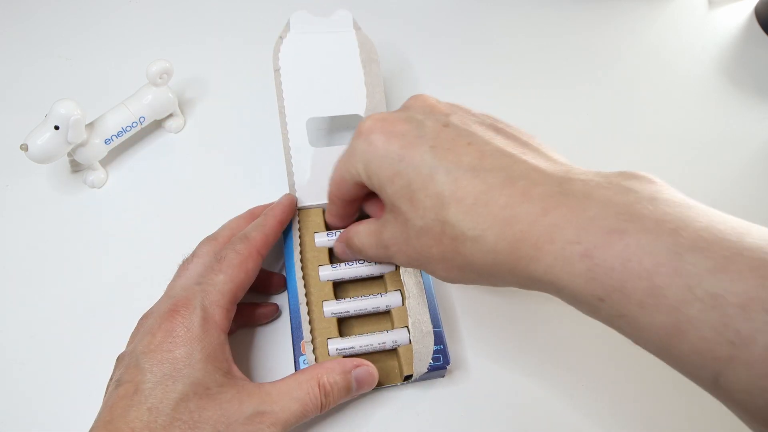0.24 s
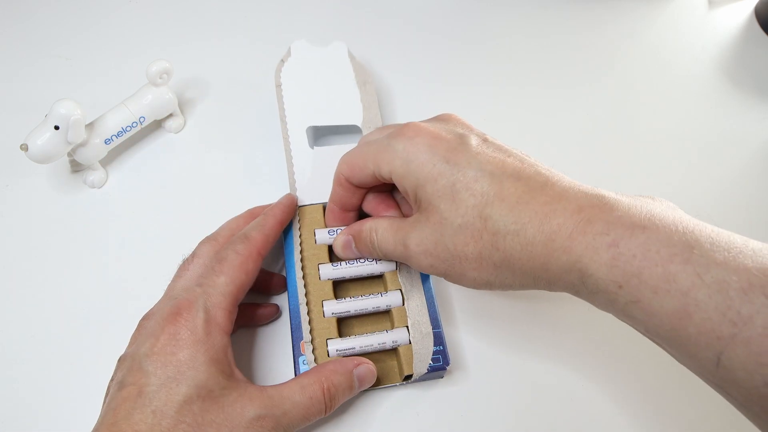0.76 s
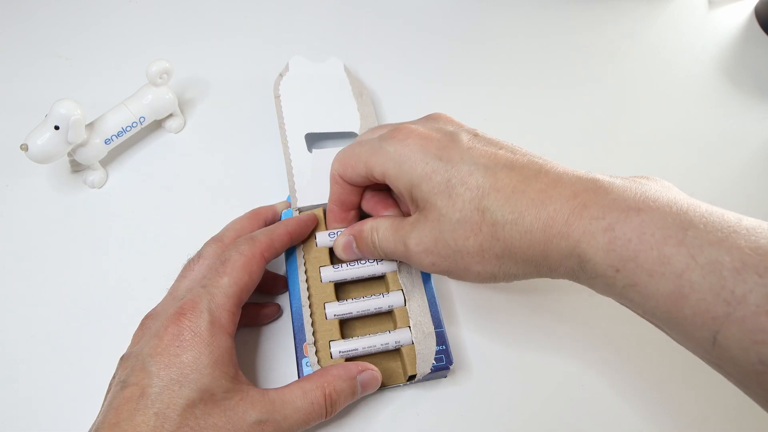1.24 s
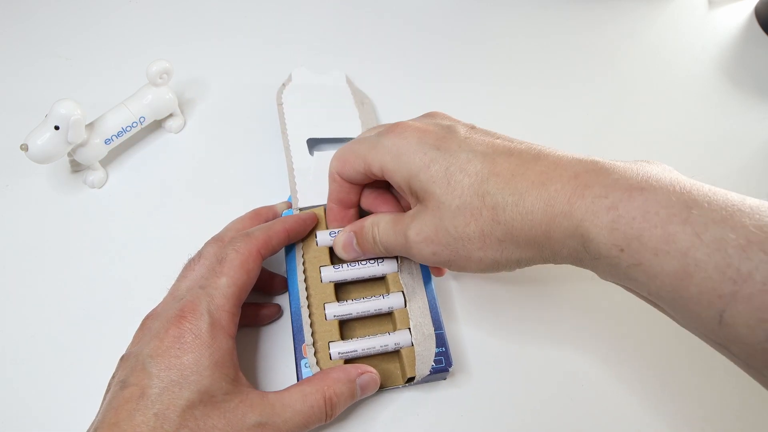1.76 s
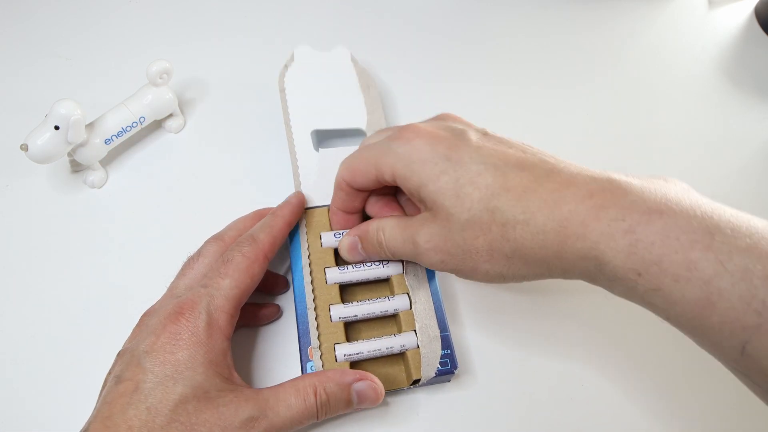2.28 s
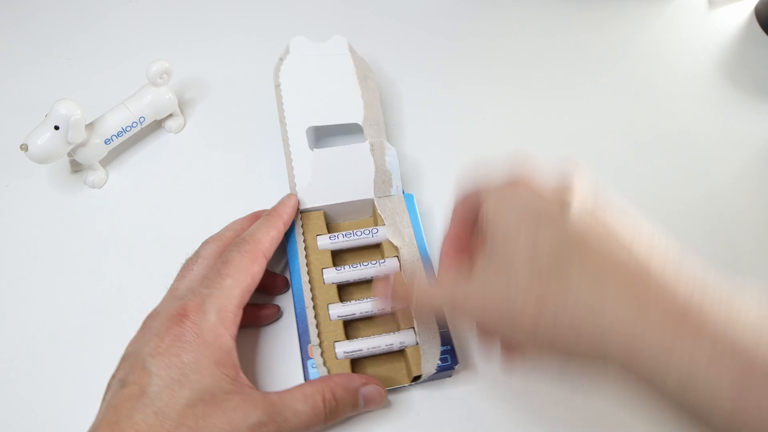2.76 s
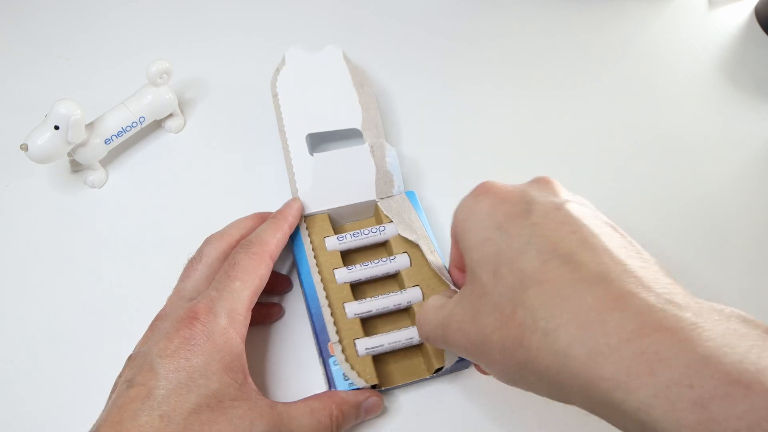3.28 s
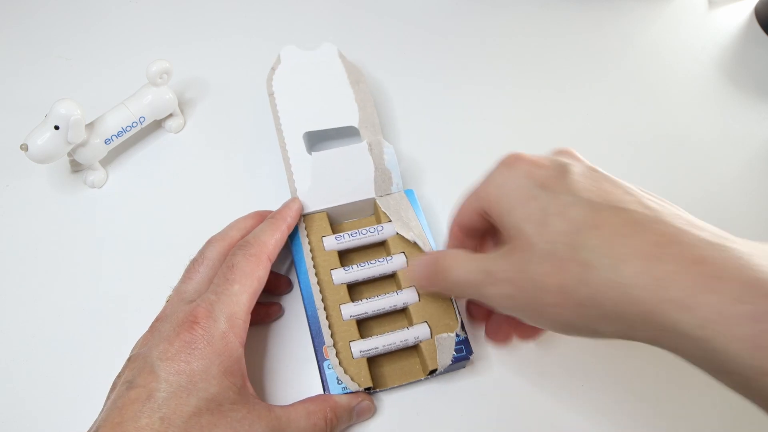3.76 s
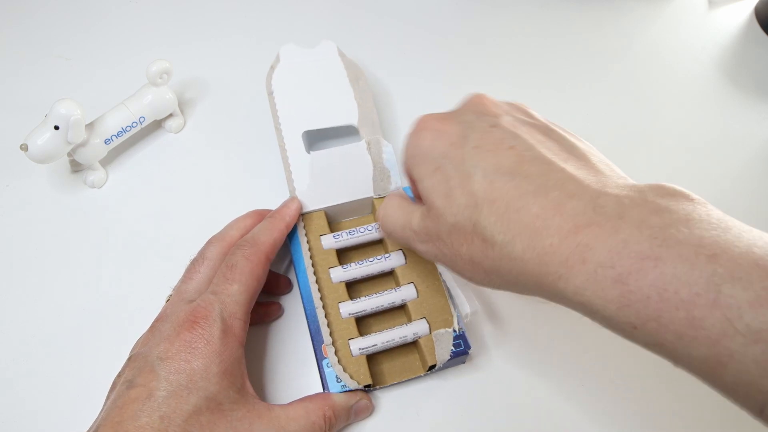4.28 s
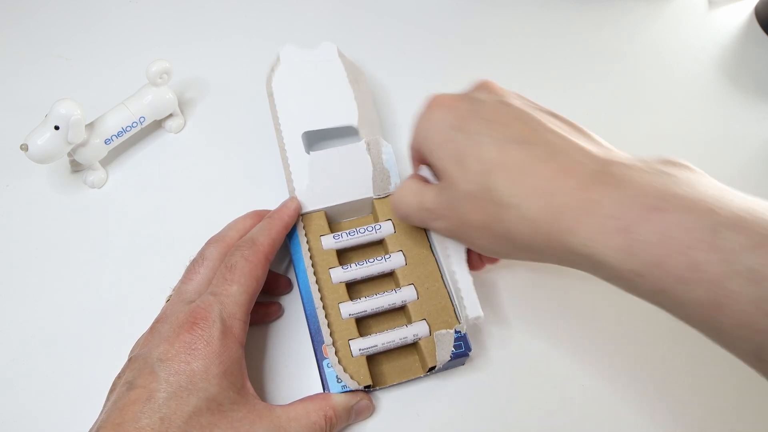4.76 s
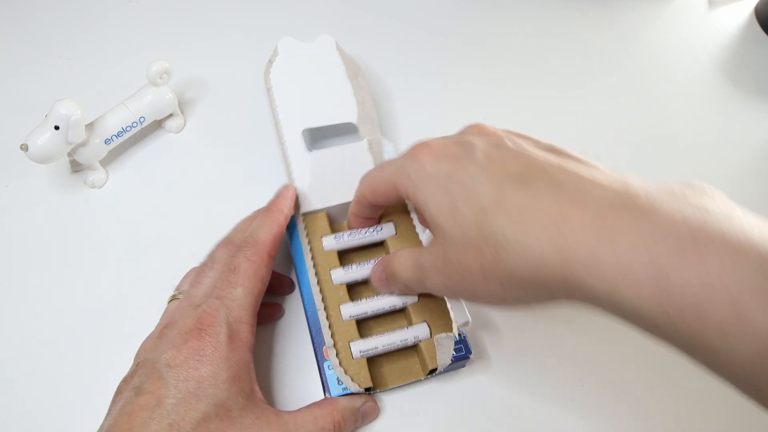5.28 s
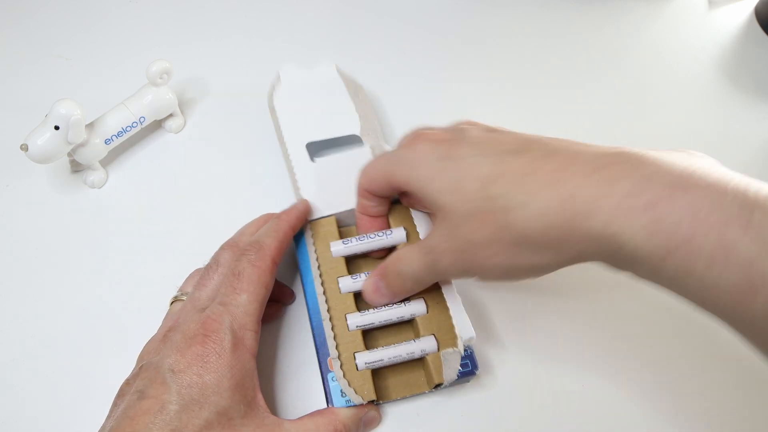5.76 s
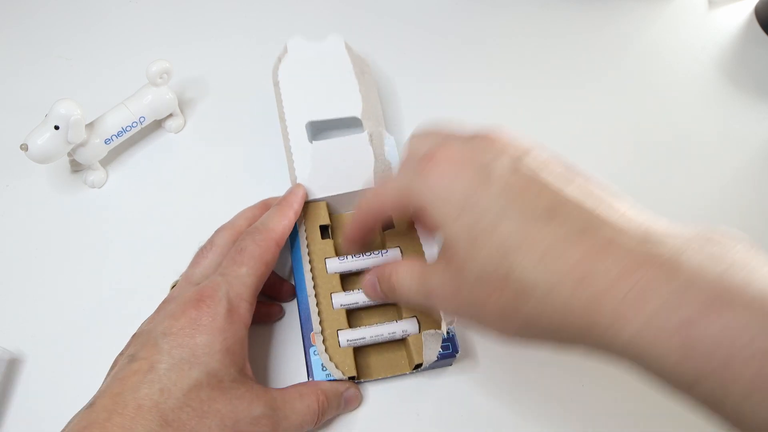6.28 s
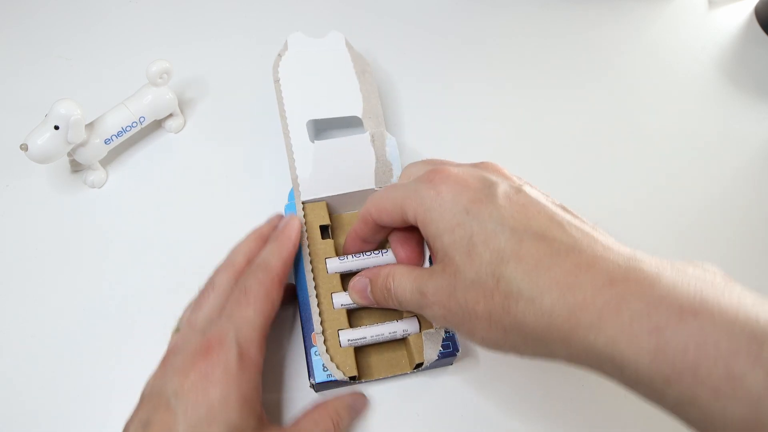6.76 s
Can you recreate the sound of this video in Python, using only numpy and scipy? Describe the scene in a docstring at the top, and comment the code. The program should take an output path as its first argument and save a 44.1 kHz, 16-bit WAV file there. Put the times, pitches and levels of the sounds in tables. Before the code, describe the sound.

Close microphone, indoors at a desk: quiet dry card rubbing and tiny ticks come in short bursts, then crisp ripping and two hard hollow snaps. After a short squeak and the loudest pop, a small battery hits the tabletop, clattering end over end with shrinking bounces, rolling briefly. A little soft card scuffing remains over a steady faint hiss.

```python
"""At a desk in a small room, hands tear the side off a paperboard battery pack and prise a cell out of its tray.
Sliding card is filtered noise with fibre catches; rips, creases and squeaks are bursts that ring card resonances.
Stiff panels pop as resonances with a sinking hollow ring; bumps and the box itself add dull thuds.
The cell drops, bounces end over end and rolls: desk modes, scattered waves and a low hum.
Echoes and diffuse tails surround these over steady noise; gain control and clipping limit the loudest sounds."""
import sys
import numpy as np
from scipy import signal
from scipy.io import wavfile
from scipy.ndimage import uniform_filter1d

SR = 44100
rng = np.random.default_rng(int(sys.argv[2]) if len(sys.argv) > 2 else 0)


def put_to_file(sound):
    """Save the sound as 16-bit audio at rate SR, in the file named by the first command-line argument."""
    columns = np.atleast_2d(sound).T  # one column per channel
    safe = np.clip(columns, -1, 1)
    whole_steps = np.round(safe * 32767)
    wavfile.write(sys.argv[1], SR, whole_steps.astype(np.int16))


N = 309582
TIME = np.arange(N) / SR

# Tabulated levels are relative; each synthesis function applies its own offset.
# Nominal widths, swells and falls are scaled where the resonance or envelope is formed.

# Runs of ripping fibres: t/s, level/dB, card resonance f/Hz, treble level/dB, nominal swell t/s, nominal fall t/s
RIPS = [(0.3624, -28, 5050, -8.5, 0.0022, 0.0041), (0.3644, -34.5, 2300, -20, 0.0032, 0.0066),
        (1.9688, -36, 2170, -11, 0.0015, 0.0099), (2.167, -28.5, 2330, -15, 0.0013, 0.0081),
        (2.648, -34, 5000, -9.5, 0.0054, 0.0086), (3.2977, -20, 6030, -2.5, .0037, 0.0057),
        (3.3628, -27.5, 4450, -0.5, 0.0025, 0.0032), (3.6624, -24, 5240, .5, 0.0025, .004),
        (3.6765, -24.5, 2840, -10, 0.00082, 0.0052), (4.1154, -38, 2320, -1.5, 0.0041, .012),
        (4.3587, -28.5, 2850, -2, 0.00016, 0.023), (4.401, -34.5, 2100, -0.5, 0.0037, 0.002),
        (4.6478, -25.5, 5260, -16.5, 0.0024, 0.019), (4.766, -23, 2050, -4.5, .0016, 0.004),
        (4.7693, -21, 6240, 2, 0.00063, .0013), (5.0722, -45, 2250, 1, 0.0017, 0.003),
        (5.2333, -39, 2730, -7.5, 0.0055, 0.014), (5.85, -21, 2700, -5, 0.00085, 0.0076),
        (5.9387, -28, 2930, -10, 0.0026, 0.001), (6.1085, -36, 3450, -9.5, 0.0012, 0.02)]
# Nominal resonance width and thud level for a patch at PATCH_HZ
RIP_WIDTH_HZ, RIP_BASS_DB = 1200, -11
# Creases that give at once: t/s, level/dB, card resonance f/Hz, treble level/dB, nominal fall t/s
CREASES = [(0.5278, -39.5, 1800, -17.5, 0.01), (0.6927, -39, 1980, -18.5, 0.0052),
           (0.8253, -41.5, 2200, -11, 0.0038), (0.9468, -47.5, 2320, -14, 0.0045),
           (1.193, -46, 2600, -14, 0.0022), (1.202, -34.5, 1800, -8.5, 0.0016),
           (1.3032, -36.5, 1700, -12, .003), (1.3943, -46, 4040, -13, 0.0056),
           (1.441, -31.5, 1830, -8.5, 0.0022), (1.561, -44.5, 3870, -12, .004),
           (1.7843, -47, 4930, -5.5, .002), (1.9016, -38.5, 1780, -26, 0.001),
           (2.2383, -36.5, 1960, -9, 0.0035), (2.4133, -46, 1830, -25, 0.0037),
           (2.462, -46, 2050, -5, 0.0014), (3.012, -45, 1920, -15, 0.0022),
           (3.0266, -42.5, 2190, -13, .002), (3.0406, -46, 2950, -12, 0.0023),
           (3.1486, -45.5, 4200, -13.5, 0.0026), (3.2141, -36.5, 5540, -16, .009),
           (3.2996, -18.5, 1880, -12, .002), (3.5862, -35, 2070, 2.5, 0.0015),
           (3.8252, -36, 3000, -7, 0.0034), (3.9995, -28, 1980, -20, 0.0037),
           (4.0224, -35.5, 1940, -31, .0013), (4.226, -31, 2000, -16, 0.001),
           (4.3255, -32.5, 2160, -19, 0.0046), (4.494, -39, 3050, -34, 0.015),
           (4.606, -30.5, 2900, -15, .005), (4.6775, -33.5, 2000, -5.5, .0025),
           (4.962, -44.5, 1940, -6, 0.00074), (5.185, -54.5, 4970, -2, .0013),
           (5.288, -45.5, 2030, -5.5, 0.0011), (5.3395, -39, 2600, -5.5, .004),
           (5.599, -35, 3400, -7.5, 0.0018), (5.6314, -43, 2070, -6, .009),
           (5.9843, -39.5, 1857, -19, 0.0024), (6.0605, -39, 2030, -11, 0.0035),
           (6.647, -52, 5500, 1, .002), (6.668, -47, 6030, 1, .001)]
# Dull creases ring more narrowly: treble level/dB, nominal width f/Hz
CREASE_WIDTHS = [(-18, 650), (-14.5, 1150)]
CREASE_BASS_DB = -12.5
# A smaller patch of card rings higher and broader and shakes the box less
PATCH_HZ, WIDTH_POWER, BASS_DB_PER_OCTAVE = 2000, 0.25, -4
# Small crackles under the strokes, with level relative to the friction
CRACKLES_PER_S, CRACKLE_OVER_DB, CRACKLE_SPREAD_DB = 26, -4, 5.5
CRACKLE_LOW_HZ, CRACKLE_HIGH_HZ, CRACKLE_TREBLE_DB, CRACKLE_FALL_S = 1700, 3680, -4, 0.0016
CRACKLE_SLIDING_DB = -1.5  # weaker where the card only slides
# Single perforation bridges snap, thin and bright: t/s, level/dB
BRIDGES = [(3.249, -49.5), (3.2697, -43), (3.37, -37), (3.4170, -54), (3.4858, -52.5), (3.6447, -38.5),
           (3.903, -44), (4.4404, -53)]
BRIDGE_HZ, BRIDGE_WIDTH_HZ, BRIDGE_TREBLE_DB, BRIDGE_BASS_DB, BRIDGE_FALL_S = 5500, 1620, 4.5, -16, 0.0023
# The cell squeaks against its slot: t/s, level/dB, pitch f/Hz, nominal width f/Hz, nominal fall t/s
SQUEAKS = [(5.488, -16, 3030, 264, 0.0028), (5.4886, -26, 4410, 347, 0.0014),
           (5.5039, -27.5, 2980, 624, 0.0035), (5.532, -27.5, 1950, 423, 0.0066),
           (5.5446, -34.5, 2000, 400, 0.0028)]
SQUEAK_TREBLE_DB, SQUEAK_BASS_DB, SQUEAK_SWELL_S = -18, -29.5, 0.00073
# Dull bumps of fingers and cell on the tray: t/s, level/dB, card resonance f/Hz, bass level/dB
BUMPS = [(0.873, -41, 1030, -9), (1.055, -46, 1040, -12), (1.084, -48.5, 1040, 2), (1.135, -50, 900, 7),
         (1.374, -52, 840, 17), (1.456, -41.5, 1270, -9), (1.525, -41.5, 1130, -3), (2.2481, -37, 930, 1),
         (5.8058, -27, 1650, 5.5), (5.8637, -23.5, 1480, 2.5)]
BUMP_WIDTH_HZ, BUMP_TREBLE_DB, BUMP_SWELL_S, BUMP_FALL_S = 650, -21, .0009, 0.0035
# Spectrum of the broad rip: f/Hz, level per hertz/dB
RIP_COLOUR = [(300, -37.5), (700, 0), (1200, 1), (2200, 4), (4000, 4), (6000, -3), (8000, -33.5)]
# Spectrum of the box under a rip: f/Hz, level per hertz/dB
THUD_COLOUR = [(60, -34), (130, -4.5), (220, 3), (330, 4.5), (480, -11.5), (1400, -43.5)]

# Fingers and card sliding on card: start t/s, length t/s, friction level/dB, treble level relative to it/dB,
# rumble level of the box/dB, hardest push as a share of the length (0-1)
STROKES = [(0.016, 0.063, -57.5, 2, -61, 0.8), (0.189, 0.3, -53.5, -3.5, -60, 0),
           (0.338, .11, -41.5, -9, -47.5, 0.33), (0.467, 0.087, -48, -5.5, -56.5, 0.26),
           (0.557, 0.22, -58.5, -11, -69, .1), (0.815, 0.073, -50.5, -7, -58, 1),
           (1.01, 0.11, -57, -9, -49, 0.33), (1.193, 0.13, -50.5, -25, -56, .3),
           (1.44, 0.055, -49, -21, -55, 0.4), (1.53, .06, -57.5, -16, -54, 0.3),
           (1.673, 0.13, -57, -22, -49.5, 0.8), (1.907, 0.14, -39, -9.5, -45, 0.5),
           (2.091, 0.033, -41.5, -4.5, -63, 0.23), (2.14, 0.047, -41, -23, -59, 0.8),
           (2.237, 0.071, -48.5, -12, -49.5, 0.05), (2.42, 0.087, -48.5, -12, -50.5, 0.1),
           (2.484, 0.042, -40.5, -16, -47, 0.1), (2.537, 0.12, -39.5, -6, -50.5, 0.33),
           (2.713, 0.042, -61, -3, -56, .4), (2.852, 0.047, -40.5, -3, -51, 0.43),
           (2.943, 0.056, -48, -2, -46.5, 0.03), (3.046, 0.12, -48.5, -12, -52, 0.2),
           (3.205, .08, -51, 1, -73, .95), (3.299, 0.098, -37.5, -8, -44.5, 0.04),
           (3.49, 0.19, -41.5, -4, -49.5, 0.63), (3.655, 0.093, -34, -5.5, -34.5, 0),
           (3.754, 0.1, -41.5, -5.5, -51, 0.04), (3.879, 0.079, -40, -4, -55, 0.34),
           (3.981, 0.062, -41, -8, -46, 0.5), (4.05, 0.069, -49, 0, -68, 0.77),
           (4.151, 0.14, -42.5, -6, -51, 0.6), (4.291, 0.1, -36.5, -4.5, -42, 0.4),
           (4.548, 0.12, -37.5, -10, -58.5, 0.44), (4.688, 0.086, -45.5, -1.5, -65.5, 0.54),
           (4.769, 0.058, -35.5, -18, -36, 0.02), (4.912, 0.04, -42, -5, -46, 0.8),
           (4.991, 0.073, -52.5, -1, -72, 0.94), (5.202, 0.41, -49.5, -6, -62, 0.24),
           (5.383, .085, -36, -7, -37, 0.38), (5.479, 0.08, -34.5, -14, -72, 0),
           (5.612, 0.13, -44.5, -10, -50.5, 0.8), (5.769, 0.09, -42, -9.5, -41.5, 0.9),
           (5.85, 0.12, -39, -4, -36.5, 0.45), (5.996, 0.23, -43.5, -4, -55, 0.04),
           (6.669, 0.16, -52.5, -4, -65, 0.36), (6.82, 0.098, -61, 2, -83, 0.56)]
# A stroke grips, pushes hardest once, is softer at both ends and dies away
GRIP_S, RELEASE_S, EASE_DB = 0.0048, 0.02, 8
HOLD_DB, HOLD_TREBLE_DB, HOLD_RUMBLE_DB = -63, -70, -61.5  # faint friction of the holding hand
# Faint holding friction sinks between the two times; a row whose second time is earlier has no effect:
# first t/s, second t/s
HOLD_DIPS = [(0.09, 0.2), (1.81, 1.8), (2.77, 2.65), (5.09, 5.21), (6.7, 6.3)]
HOLD_DIP_DB = -7
# Stretches where the card really tears rather than slides: start t/s, end t/s
TEARS = [(0.35, 0.45), (1.93, 2.37), (3.52, 4.14), (4.3, 4.42), (4.571, 4.62)]
# Spectrum of the sliding body: f/Hz, level per hertz/dB
RUB_COLOUR = [(150, -17.5), (400, -7), (700, -6), (1100, 2), (1500, 0), (2100, 3.5), (3000, -2.5),
              (4000, -3), (5500, -2), (7000, -9.5), (9500, -34)]
# Spectrum of the treble in sliding and rips: f/Hz, level per hertz/dB
FIZZ_COLOUR = [(3500, -33), (5500, 0.5), (7000, 6), (8500, 7), (11000, 0), (13000, -7), (16000, -18.5)]
# Spectrum of the sliding rumble: f/Hz, level per hertz/dB
RUMBLE_COLOUR = [(30, -13.5), (70, 0), (120, 2.5), (180, -1.5), (320, 4.5), (480, -7), (700, -5.5),
                 (1400, -35)]

# Panels snapping free: t/s, panel peak level/dB, panel f/Hz, hollow ring level/dB, box thump level/dB, thump f/Hz
POPS = [(3.2994, -1, 1080, -19.5, -25.5, 349), (4.7691, -7, 1412, -23.5, -23, 229),
        (5.853, 3.5, 1755, -31, -28.5, 301.5), (5.8645, -33, 763, -37, -24.5, 234)]

# The cell strikes the desk, one end and then the other: t/s, strength level/dB
BOUNCES = [(6.1897, 1.5), (6.1971, 3), (6.3380, 1), (6.3423, 2), (6.4278, -10), (6.4350, -2),
           (6.487, -10.5), (6.4945, -8), (6.5185, -11), (6.524, -10), (6.5427, -13.5), (6.5450, -12.5),
           (6.5622, -13), (6.5744, -17.5), (6.5839, -22), (6.59, -22), (6.7233, -38.5)]
# Modes of the desk: f/Hz, level/dB, 60 dB decay before the cell's added damping t/s
DESK = [(327, -6, .06), (553, -14, .06), (689, -13, .06), (843, -12, .06), (1046, -13, .06),
        (1351, -4, .06), (1494, -3, .06), (1764, -1, .06), (1961, -2, .06), (2319, 0, .07), (2523, -4, .07),
        (2653, -3, .07), (2859, -2, .07), (3108, -3, .07), (3226, -3, .07), (3327, -6, .06),
        (3578, -4, .06), (3807, -6, .06), (4049, -7, .06), (4226, -6, .06), (4834, -12, .05)]
# Spectrum of the hard knock: f/Hz, level per hertz/dB
KNOCK_COLOUR = [(40, -40), (130, -29.5), (250, -0.5), (500, -6), (650, -3), (900, -11), (1500, 2),
                (2400, 2.5), (3600, -1.5), (5000, -5.5), (6500, -22), (10000, -29), (16000, -54)]
# Loudness of the rolling cell: t/s, level/dB
ROLL = [(6.55, -64), (6.6, -33), (6.68, -61), (6.73, -38.5), (6.8, -59), (6.85, -46), (6.92, -58),
        (7.02, -49.5)]
# Low desk modes excited by rolling: f/Hz, nominal width f/Hz, level/dB
ROLL_MODES = [(303, 24, 2), (594, 190, -7)]

# Reflections from desk, walls and ceiling: delay t/s, level/dB
ECHOES = [(.0088, -7), (0.0141, -19.5), (0.014, -19.5), (0.0197, -26), (.0315, -33.5), (0.042, -35.5)]
# Reverberation time of the room: f/Hz, 60 dB decay t/s
ROOM_T60 = [(200, 0.12), (550, 0.47), (1400, 0.3), (3500, 0.37), (6000, 0.35), (10000, 0.27), (16000, 0.46)]
# Spectrum of the steady room noise: f/Hz, level per hertz/dB
FLOOR = [(20, 11.5), (50, 8.5), (90, 4.5), (150, 6.5), (300, -4), (550, -4.5), (1000, -6), (2000, -17.5),
         (4000, -18.5), (8000, -21), (16000, -22)]
LOW_CUT_HZ, EDGE_HZ = 115, 15900


def ripping(level, size=4096):
    """Avalanche fracture: breaking fibres swell, let go and excite damped resonances of the card."""
    out = np.zeros(N)
    t = (np.arange(size) - size // 4) / SR
    broad, fizz, thud = click(RIP_COLOUR), click(FIZZ_COLOUR), click(THUD_COLOUR)
    for s, db, hz, width, bass_db, treble_db, swell, fall in breaks(level):
        rise = -(t / max(2.4 * swell, 1 / SR)) ** 2
        decay = -t / max(0.85 * fall, 1 / SR)
        shape = np.exp(np.where(t < 0, rise, decay))
        burst = unit(fibres(per_s=3300, spread_db=-2.5, hiss=1.0, size=size) * shape)
        burst[size // 4] += 0.61 * np.exp(-swell / 0.00054)  # a crease that gives at once starts with a snap

        card = through(burst, broad)
        ring = resonate(resonate(card, hz, 1.1 * width), hz, 1.1 * width)
        # against a sharp resonance the slips lock into a tone
        squeak = np.clip((480 - width) / 200, 0, 1)
        tone = unit(shape * np.sin(2 * np.pi * hz * t))
        ring = np.sqrt(1 - squeak) * unit(ring) + np.sqrt(squeak) * tone
        # a loose, well damped flap sounds broader
        spill = np.clip((width - 220) / 650, .08, 1.2)

        sound = unit(unit(ring) + spill * unit(card))
        sound += amp(treble_db - 1.0) * unit(through(burst, fizz))
        sound += amp(bass_db - 9.0) * unit(through(burst, thud))
        add(out, s + t[0], amp(db + 0.55) * np.sqrt(SR / 10 ** 2) * sound)
    return out


def breaks(level):
    """Impulsive excitation: yields t/s, level/dB, f/Hz, width/Hz, bass/dB, treble/dB, swell/s, fall/s."""
    for s, db, hz, treble_db, swell, fall in RIPS:
        yield s, db, hz, *patch(hz, RIP_WIDTH_HZ, RIP_BASS_DB), treble_db, swell, fall
    for s, db, hz, width, fall in SQUEAKS:
        yield s, db, hz, width, SQUEAK_BASS_DB, SQUEAK_TREBLE_DB, SQUEAK_SWELL_S, fall
    for s, db in BRIDGES:
        yield s, db, BRIDGE_HZ, BRIDGE_WIDTH_HZ, BRIDGE_BASS_DB, BRIDGE_TREBLE_DB, 0, BRIDGE_FALL_S
    for s, db, hz, bass_db in BUMPS:
        yield s, db, hz, BUMP_WIDTH_HZ, bass_db, BUMP_TREBLE_DB, BUMP_SWELL_S, BUMP_FALL_S
    for s, db, hz, treble_db, fall in CREASES + crackles(level):
        width = np.interp(treble_db, *np.transpose(CREASE_WIDTHS))
        yield s, db, hz, *patch(hz, width, CREASE_BASS_DB), treble_db, 0, fall


def patch(hz, width_hz, bass_db):
    """Scaling of resonators: a smaller patch rings higher and broader, with less bass from the box."""
    width = width_hz * (hz / PATCH_HZ) ** WIDTH_POWER
    bass = bass_db + BASS_DB_PER_OCTAVE * np.log2(hz / PATCH_HZ)
    return width, bass


def crackles(level, count=400):
    """Poisson process: small creases give at random, as loud as the hand is pushing, most of all in a tear."""
    wait, size, place = rng.random((count, 3)).T
    times = np.cumsum(-np.log(1 - wait)) / CRACKLES_PER_S
    strain_db = 20 * np.log10(level) + CRACKLE_SLIDING_DB * (1 - during(TEARS))
    db = np.interp(times, TIME, strain_db) + CRACKLE_OVER_DB + CRACKLE_SPREAD_DB * (2 * size - 1)
    hz = CRACKLE_LOW_HZ * (CRACKLE_HIGH_HZ / CRACKLE_LOW_HZ) ** place
    return [(s, d, f, CRACKLE_TREBLE_DB, CRACKLE_FALL_S) for s, d, f in zip(times, db, hz) if s < TIME[-1]]


def rubbing(level, treble, shake):
    """Stick-slip friction: sliding hisses, tearing adds catches, and a shifting grip favours other patches."""
    share = .12 + .65 * during(TEARS)  # share of the power in catching fibres
    catches = fibres(per_s=520, spread_db=3.7, hiss=0, size=N) * amp(2.5 * drift(per_s=90) - .7)
    slide = rng.standard_normal(N) * amp(.9 * drift(per_s=150))
    grain = np.sqrt(1 - share) * slide + np.sqrt(share) * catches

    # smoothed random gains over frequency and time
    hz, t, z = signal.stft(grain, SR, nperseg=256)
    patches = uniform_filter1d(rng.standard_normal(z.shape), size=10, axis=0)
    patches = evened(uniform_filter1d(patches, size=8, axis=1))
    grain = signal.istft(z * amp(2.93 * patches), SR, nperseg=256)[1][:N]

    body = level * amp(2.0) * evened(through(grain, click(RUB_COLOUR)))
    fizz = treble * amp(0.7) * evened(through(grain, click(FIZZ_COLOUR)))
    shaking = fibres(per_s=150, spread_db=-1.5, hiss=0.54, size=N)
    rumble = shake * amp(-1.86) * evened(through(shaking, click(RUMBLE_COLOUR)))
    return body + fizz + rumble


def friction():
    """Power addition: stroke powers add to the holding hand, giving friction, treble and rumble gains."""
    holding = amp(HOLD_DIP_DB * during(HOLD_DIPS))
    power = (amp([[HOLD_DB], [HOLD_TREBLE_DB], [HOLD_RUMBLE_DB]]) * holding) ** 2
    t = np.arange(SR // 2) / SR - GRIP_S / 2
    for start, length, db, treble_db, rumble_db, push in STROKES:
        hardest = np.clip(push, .02, .98) * length
        effort = amp(np.interp(t, [0, hardest, length], [-EASE_DB, 0, -EASE_DB]))
        grip = np.clip(t / GRIP_S + .5, 0, 1)
        release = np.exp(-np.maximum(t - length, 0) / RELEASE_S)
        shape = effort * grip * release
        for layer, layer_db in zip(power, (db, db + treble_db, rumble_db)):
            add(layer, start + t[0], (amp(layer_db) * shape) ** 2)
    return np.sqrt(power)


def popping(size=8000):
    """Snap-through: a bent panel flips straight, the hollow of the box rings on, and the box thumps the desk."""
    out, t = np.zeros(N), np.arange(size) / SR
    kick = signal.unit_impulse(size)
    for s, db, hz, ring_db, thump_db, thump_hz in POPS:
        panel = resonate(resonate(kick, hz, 0.28 * hz), hz, 7.1 * hz)
        thump = resonate(resonate(kick, thump_hz, 77), thump_hz, 200)
        sag = 0.83 + .25 * np.exp(-t / 0.015)  # the ring sinks as the panel relaxes
        slow = signal.butter(2, 190, fs=SR, output="sos")
        flutter = evened(signal.sosfilt(slow, rng.standard_normal(size)))
        hollow = flutter * np.sin(2 * np.pi * np.cumsum(hz * sag) / SR) * amp(ring_db + 1.5 - 60 * t / 0.15)
        panel = amp(db) * panel / abs(panel).max()
        thump = amp(thump_db) * thump / abs(thump).max()
        add(out, s, panel + thump + hollow)
    return out


def clatter(size=8192):
    """Modal excitation: hard steel knocks the desk, rings its modes and scatters waves from its edges."""
    out, t = np.zeros(N), np.arange(size) / SR
    hz, mode_db, t60 = np.transpose(DESK)[:, :, None]
    knock = click(KNOCK_COLOUR)
    for s, db in BOUNCES:
        # every landing place favours other modes
        spot = (1 + .3 * rng.standard_normal(hz.shape)) * rng.choice([-1, 1], hz.shape)
        # the cell's own weight adds 150 dB/s of damping
        fading = amp(mode_db - 60 * t / t60 - 150 * t)
        modes = unit((spot * fading * np.sin(2 * np.pi * hz * t)).sum(0))
        scatter = unit(rng.standard_normal(size) * amp(-60 * t / 0.018))
        scatter[0] += .6
        add(scatter, .0021, np.array([.4]))  # the wave returns from the nearest edge
        add(out, s, amp(db + 24.5) * (0.61 * modes + 1.01 * unit(through(scatter, knock))))
    return out


def rolling():
    """Forced vibration: random rolling contact hums in the lowest modes of the desk."""
    contact = rng.standard_normal(N)
    hum = np.zeros(N)
    for hz, width, db in ROLL_MODES:
        hum += amp(db) * resonate(resonate(contact, hz, 1.3 * width), hz, 1.0 * width)
    level_db = np.interp(TIME, *np.transpose(ROLL), left=-120) - 2
    return evened(hum) * amp(level_db)


def room(x, echo_db, tail_db, size=24000, count=4):
    """Reverberation: a few near echoes precede short diffuse tails, which alternate every 47 ms."""
    early = np.zeros(size)
    softened = signal.lfilter([.6], [1, -.4], signal.unit_impulse(32))
    for delay, db in ECHOES:
        add(early, delay, amp(db + echo_db) * softened)
    out = x + through(x, early)
    place = np.floor(TIME / .047) % count
    # small sources send little bass into the room
    bass_cut = signal.butter(1, 380, "high", fs=SR, output="sos")
    for k in range(count):
        hz, t, z = signal.stft(rng.standard_normal(size), SR, nperseg=256)
        fading = amp(-60 * t / read(ROOM_T60, hz)[:, None])
        tail = signal.istft(z * fading, SR, nperseg=256)[1]
        tail = signal.sosfilt(bass_cut, tail)
        onset = np.minimum(np.arange(len(tail)) / SR / .006, 1)
        tail = amp(tail_db) * unit(tail * onset)
        turn = np.sqrt(abs(uniform_filter1d(1. * (place == k), size=200)))
        out = out + through(x * turn, tail)
    return out


def room_noise():
    """Stationary random noise: white noise takes the spectrum of the quiet room."""
    return amp(-54) * evened(through(rng.standard_normal(N), click(FLOOR)))


def fibres(per_s, spread_db, hiss, size):
    """Shot noise: tiny catches and breaks of uneven size lie over a smooth hiss."""
    chance, height, noise = rng.random(size), rng.exponential(1, size), rng.standard_normal(size)
    catches = (chance < per_s / SR) * np.sign(noise) * amp(spread_db * np.minimum(height, 4))
    return evened(evened(catches) + hiss * noise)


def drift(per_s):
    """Random modulation: straight lines join normally distributed values at a given rate."""
    knots = rng.standard_normal(N // 32)
    return np.interp(TIME * per_s, np.arange(len(knots)), knots)


def during(spans):
    """Gating: one inside the spans, zero outside, with soft edges."""
    inside = sum(1. * ((TIME > start) & (TIME < end)) for start, end in spans)
    return uniform_filter1d(inside, size=900)


def click(points, size=2048):
    """Minimum phase: the shortest causal pulse that has a given spectrum."""
    log_gain = np.log(amp(read(points, abs(np.fft.fftfreq(size, 1 / SR)))))
    spectrum = np.exp(np.conj(signal.hilbert(log_gain)))
    return unit(np.fft.ifft(spectrum).real[:size // 2])


def resonate(x, hz, width):
    """Resonance: a second-order filter with a given centre and width."""
    return signal.lfilter(*signal.iirpeak(hz, hz / width, fs=SR), x)


def through(x, response):
    """Convolution: filters by an impulse response and keeps the length."""
    return signal.oaconvolve(x, response)[:len(x)]


def read(points, hz):
    """Interpolation: reads a table on a log-frequency axis."""
    f, value = np.transpose(points)
    return np.interp(np.log(hz + 1), np.log(f + 1), value)


def add(mix, s, sound):
    """Superposition: mixes a sound in at s seconds."""
    part = mix[max(round(s * SR), 0):][:len(sound)]
    part += sound[:len(part)]


def amp(db):
    """Logarithmic level: decibels to amplitude gain."""
    return 10 ** (np.asarray(db) / 20)


def evened(x):
    """Power normalisation: scales to an rms of one."""
    return x / np.sqrt(np.mean(x ** 2) + 1e-20)


def unit(x):
    """Energy normalisation: scales to an energy of one."""
    return x / np.sqrt(np.sum(x ** 2) + 1e-20)


def scene():
    """Superposition: card and cell sound in the room, over its steady noise."""
    level, treble, shake = friction()
    card = ripping(level) + rubbing(level, treble, shake) + popping()
    card = room(card, echo_db=-9.5, tail_db=-13.5)
    cell = room(clatter() + rolling(), echo_db=-3, tail_db=-8.5)
    return (card + cell + room_noise())[None]


def record(dry):
    """Dynamic compression: after a low cut, loud sounds duck the gain; peaks clip before the band limit."""
    low_cut = signal.butter(2, LOW_CUT_HZ, "high", fs=SR, output="sos")
    thinned = signal.sosfilt(low_cut, dry)
    keep = np.exp(-1 / (0.03 * SR))  # power is averaged over about 30 ms
    power_db = 10 * np.log10(signal.lfilter([1 - keep], [1, -keep], thinned[0] ** 2) + 1e-12)
    recovery_db = 4.5 * TIME  # the held level falls slowly after a peak
    held_db = np.maximum.accumulate(power_db + recovery_db) - recovery_db
    over_db = np.maximum(held_db + 15.5, 0)
    clipped = np.clip(thinned * amp(-.55 * over_db), -1, 1)
    band_limit = signal.firwin(511, EDGE_HZ, window=("kaiser", 9), fs=SR)
    return signal.oaconvolve(clipped, band_limit[None], "same")


dry = scene()
out = record(dry)
put_to_file(out)
```